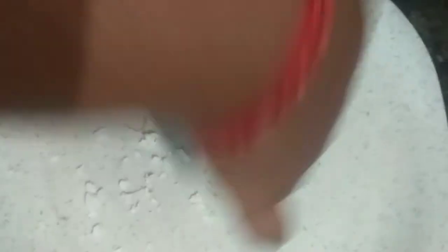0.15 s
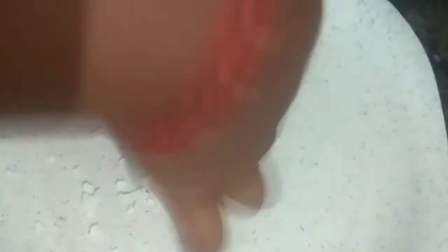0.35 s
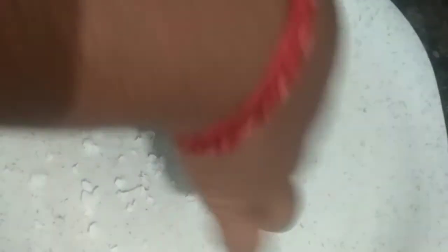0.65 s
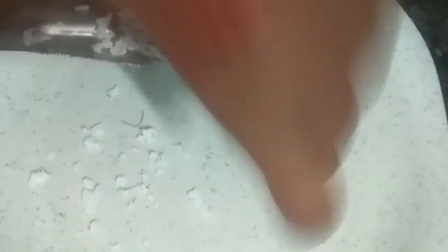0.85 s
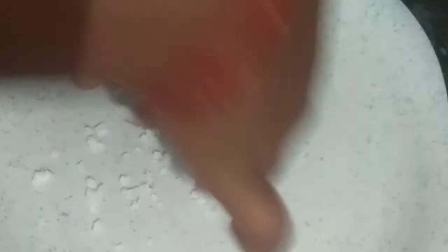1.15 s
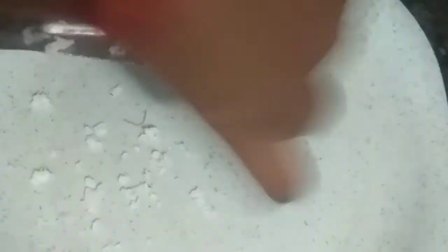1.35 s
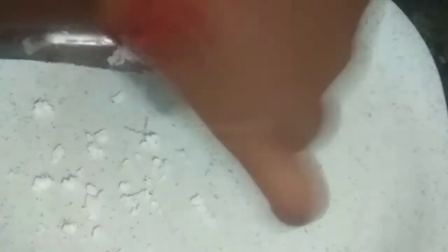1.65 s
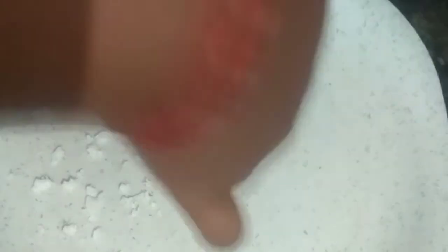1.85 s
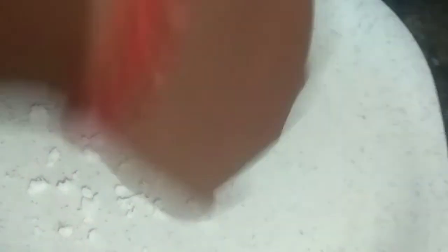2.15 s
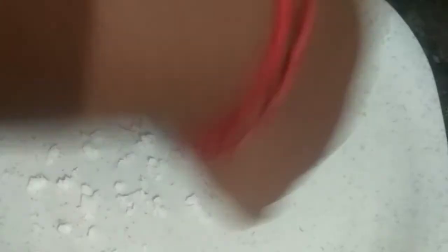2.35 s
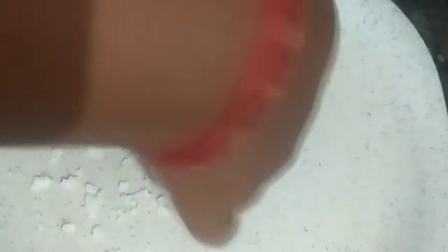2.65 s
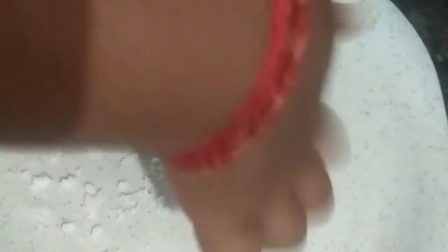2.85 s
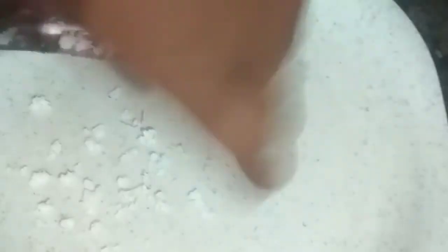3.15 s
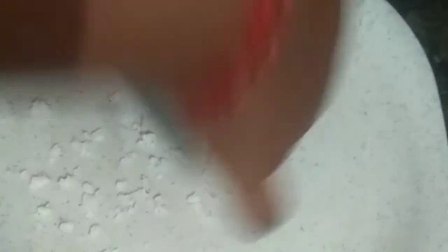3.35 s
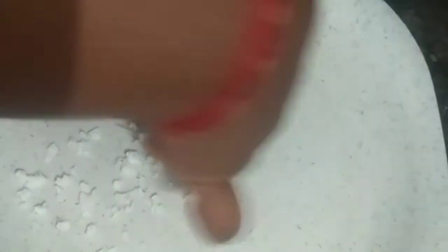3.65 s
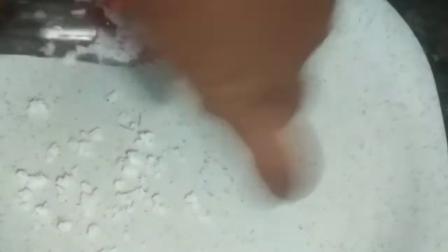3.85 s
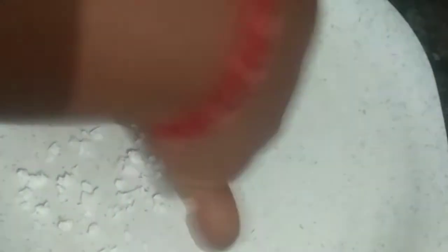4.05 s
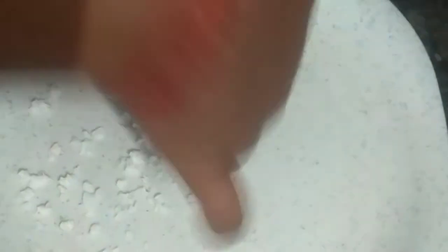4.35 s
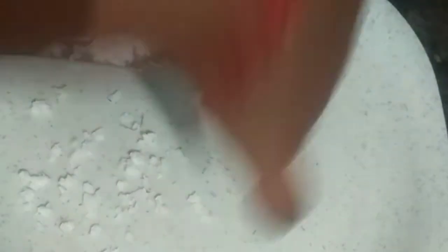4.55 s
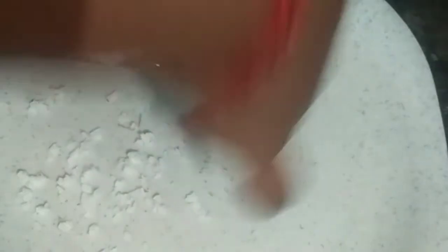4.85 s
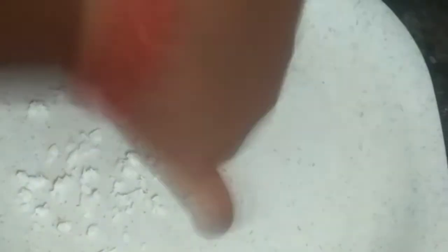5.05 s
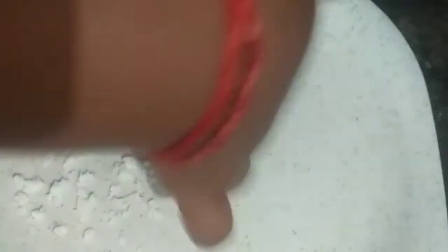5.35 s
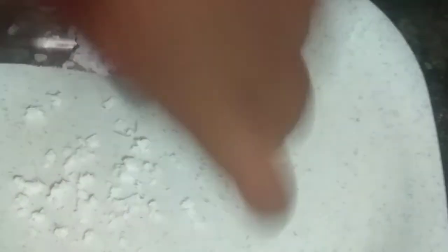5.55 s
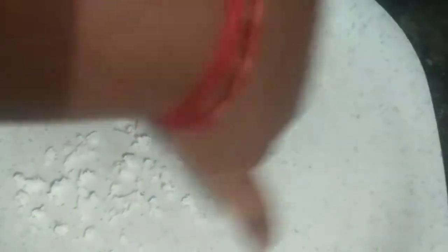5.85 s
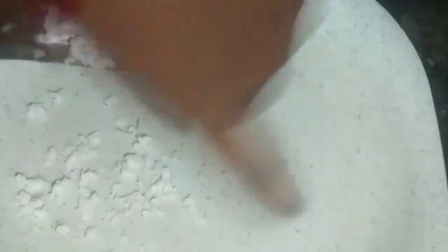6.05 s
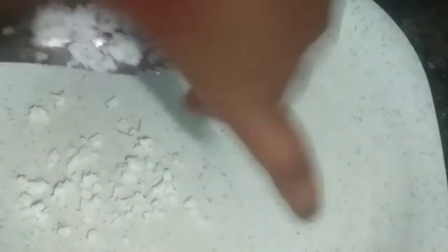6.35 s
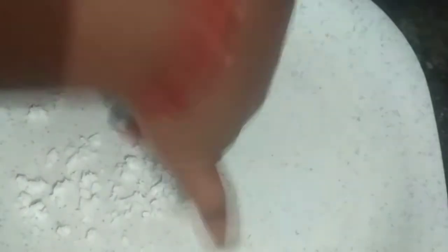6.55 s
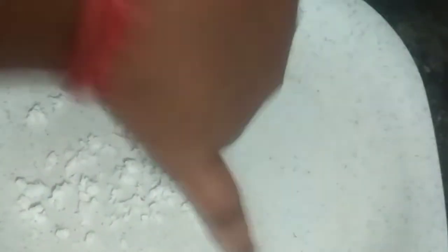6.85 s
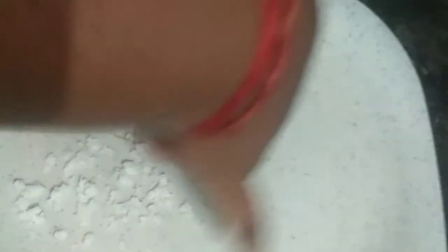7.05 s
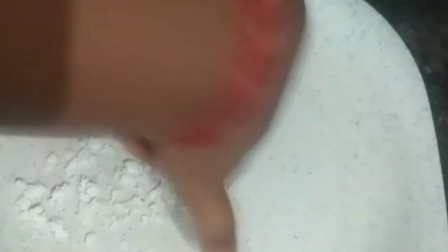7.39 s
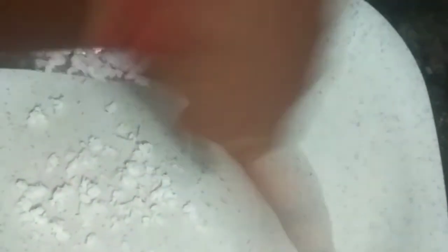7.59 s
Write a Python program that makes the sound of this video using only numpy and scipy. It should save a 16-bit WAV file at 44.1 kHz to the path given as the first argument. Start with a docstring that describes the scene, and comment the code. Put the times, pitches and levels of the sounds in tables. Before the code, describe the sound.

Close, steady rasping strokes of a coconut half scraped on a serrated metal blade, crunchy and bright, with short gaps and dull woody thumps.

```python
"""In a kitchen, close by: half a coconut is scraped over a serrated metal grater.
In each stroke the teeth tear the flesh: random click trains, coloured by filters and blade resonances.
Now and then they snag and slip: a dip, a short rip and a thump. Jerks ring the modes of shell, stand and hollow.
Between strokes come light ticks, brushing and narrow swishes of hiss, over the quiet air of the room."""
import sys
import numpy as np
from scipy import signal
from scipy.fft import rfft, irfft
from scipy.io import wavfile
from scipy.ndimage import uniform_filter1d

SR = 44100
rng = np.random.default_rng(int(sys.argv[2]) if len(sys.argv) > 2 else 0)


def master(y):
    """Save y as 16-bit WAV."""
    cut = np.clip(np.atleast_2d(y).T, -1, 1)
    pcm = np.round(cut * 32767)  # scale
    wavfile.write(sys.argv[1], SR, pcm.astype(np.int16))


N = 340452
TIME = np.arange(N) / SR

# pushes of the coconut over the teeth; layer levels are relative to an ordinary stroke:
# (start [s], length [s], gain from start to end [dB], crisp tearing [dB], coarse tearing [dB], shell [dB],
#  stand [dB], extra swell time [s], first bite before rip gain [dB], rubbing floor until next stroke [dB])
STROKES = [(-0.11, 0.14, -0.5, -2, -1.5, -1.5, 1.5, 0.0035, -20.0, -43.0),
           (0.286, 0.15, -13, -2.5, 0, 1.0, 1.0, 0.033, -20.0, -42.0),
           (0.935, 0.17, -8, 0.5, 2, 0.0, 0, 0.097, -24.0, -43.0),
           (1.3745, 0.13, -11.5, 1, 1, 4.5, 1, 0.055, -10.0, -46.0),
           (1.738, 0.13, -3.5, 1.5, 2, 1.5, 2.5, 0.041, -10.5, -42.0),
           (2.111, 0.15, -7.5, 0.0, 0.5, -0.5, -3.5, 0.037, -18.0, -51.0),
           (2.476, 0.15, -5, 0.0, 1, -1.5, -3.5, 0.048, -20.0, -44),
           (3.104, 0.16, 1.5, 4.0, 2.5, 3.5, -1.5, 0.072, -22.0, -44.0),
           (3.5112, 0.11, 4.0, 3.0, 2.0, -0.5, -2, 0.016, -5.0, -46.0),
           (3.8734, 0.13, 3.5, 2.0, 1.5, 0.5, -2.0, 0.027, -9.5, -46.0),
           (4.2445, 0.11, 2.5, 1.5, 2.5, 1.5, 1.5, 0.02, -8.0, -46.0),
           (4.604, 0.12, 5.0, -1, 1.5, 1.0, 1.5, 0.026, -9.5, -42.0),
           (5, 0.11, -4.5, 2, 6, 4.0, 5.5, 0.054, -11.0, -43.0),
           (5.622, 0.18, 1.5, -2.0, 0, -1.0, -2, 0.033, -13.5, -51.0),
           (6.0413, 0.15, 2, -1.0, -0.5, -1.5, 3.0, 0.035, -17.0, -53.0),
           (6.399, 0.157, 2, -1.0, -3, -1, -3.5, 0.032, -15.0, -48.0),
           (6.794, 0.15, 12, -3.0, -4.5, -5.5, -1, 0.0, -20.0, -51.0),
           (7.179, 0.15, 1.0, -2, -3.0, -2, 0, 0.018, -21.0, -47.0),
           (7.566, 0.15, 4, -1.5, -3.0, -2.5, -3.5, 0.014, -18.0, -47.0)]
# a tooth snags and breaks free: (time [s], level before rip gain [dB], thump relative to that level [dB])
SNAGS = [(0.3199, -7.5, -1), (0.3531, -6.5, -1), (1.0272, -6.5, -13), (1.0474, -2.5, -4),
         (1.4175, -6.5, -8), (1.4434, -6, -21), (1.814, -8, -16), (2.5338, -1.5, -19), (2.5687, -1, -16),
         (3.154, -12, -6), (3.175, 1, -1), (3.2061, 2.5, -5), (3.5598, 0, -18), (3.976, -8.5, -14),
         (4.295, -3, -7), (4.317, -5, -11), (4.6264, -5, -7), (4.652, -5, -8), (4.679, -4, 0),
         (5.044, -3, -4), (5.0713, -1, -20), (5.6868, -1.5, -19), (5.7134, -0.5, -13), (5.7357, -6, -8)]
# the coconut touches the teeth between strokes: (time [s], level before tick gain [dB])
TOUCHES = [(0.2266, -22), (0.831, -23), (1.2296, -21), (1.308, -26), (1.6766, -21), (2.4219, -28),
           (2.732, -19), (2.9832, -18), (2.9964, -24), (3.4264, -16), (3.815, -19.5), (4.1877, -15),
           (4.549, -19), (4.8302, -19), (5.4931, -15), (5.9748, -16.5), (6.351, -21), (6.721, -15.5),
           (7.119, -21), (7.51, -23)]
# resonances of the toothed blade: (frequency [Hz], width [Hz], level over the broad colour [dB])
BLADE = [(3460, 260, 1.5), (4606, 154, 7.5), (5160, 140, 7), (8230, 100, 9), (8936, 94, 10), (9320, 310, 6),
         (10230, 240, 6.5), (10880, 180, 6)]
# colour of a light touch on the teeth: (frequency [Hz], level [dB])
TICK = [(400, -13), (1200, -6), (3000, -13.5), (5500, -8.5), (7000, -6.5), (10000, 1.5), (12500, -5),
        (15700, -7.5)]


def from_db(db):
    """Decibels to gain."""
    return 10 ** (np.asarray(db) / 20)


def rms_one(x):
    """Scale to unit power."""
    return x / np.sqrt(np.mean(x ** 2) + 1e-20)


def evened(x, window_s):
    """Divide out the slow level, keep the fast grain."""
    power = np.mean(np.atleast_2d(x) ** 2, axis=0)
    width = max(int(window_s * SR), 8)
    smooth_power = uniform_filter1d(uniform_filter1d(power, width), width)
    return x / np.sqrt(smooth_power + 1e-12)


def drift(knots_per_s):
    """Random curve of unit power, linear between knots."""
    knots = rng.standard_normal(8192)
    return rms_one(np.interp(TIME * knots_per_s, np.arange(len(knots)), knots))


def highpassed(x, hz, order):
    """Butterworth bass cut below a corner."""
    return signal.sosfilt(signal.butter(order, hz, "high", fs=SR, output="sos"), x)


def convolved(x, response):
    """Causal filtering by an impulse response, one row per channel."""
    return signal.oaconvolve(np.atleast_2d(x), np.atleast_2d(response), axes=-1)[:, :N]


def coloured(x, spectrum, peaks=(), size=4096):
    """Minimum-phase filter of unit energy: a broad spectrum with resonances on top."""
    hz = np.fft.rfftfreq(size, 1 / SR) + 1   # +1 avoids log(0)
    points = np.array(spectrum)
    db = np.interp(np.log(hz), np.log(points[:, 0]), points[:, 1])
    for centre_hz, width_hz, peak_db in peaks:
        db = db + peak_db / (1 + (2 * (hz - centre_hz) / width_hz) ** 2)
    # folding the cepstrum forward in time gives minimum phase
    cepstrum = irfft(np.log(from_db(db)))
    cepstrum[1:size // 2] *= 2
    cepstrum[size // 2 + 1:] = 0
    response = irfft(np.exp(rfft(cepstrum)))
    return convolved(x, response / np.linalg.norm(response))


def ring(force, modes):
    """Parallel two-pole resonators of alternating sign; gain offsets the energy build-up of narrow modes."""
    out = 0
    for k, (hz, width_hz, db) in enumerate(modes):
        radius = np.exp(-np.pi * width_hz / SR)
        poles = [1, -2 * radius * np.cos(2 * np.pi * hz / SR), radius * radius]
        mode = signal.lfilter([1, 0, -1], poles, force + 1e-18)
        out = out + (-1) ** k * from_db(db) * np.sqrt(1 - radius) * mode
    return out


def grains(per_s, spread_db):
    """Random clicks of uneven size and either sign."""
    size_db = spread_db * np.minimum(rng.exponential(1, N), 4)
    sizes = from_db(size_db) * rng.choice([-1, 1], N)
    return sizes * (rng.random(N) < per_s / SR)


def blows(times_s, levels_db):
    """One click for each blow."""
    clicks = np.zeros(N)
    clicks[(np.asarray(times_s) * SR).astype(int)] = from_db(levels_db)
    return clicks


def bursts(rows, hold_s, fade_s):
    """Envelope of events that start at once, hold and decay exponentially."""
    out = np.zeros(N)
    for time_s, db, *_ in rows:
        first = int(time_s * SR)
        age_s = TIME[first:][:SR // 10] - time_s
        out[first:][:len(age_s)] += from_db(db) * np.exp(-np.maximum(age_s - hold_s, 0) / fade_s)
    return out


def swell(middle_s, half_s):
    """Cosine rise and fall of height one."""
    return np.cos(np.pi / 2 * np.clip((TIME - middle_s) / half_s, -1, 1))


def stroke_gain(shape, column):
    """Every stroke swells, arches while the pressure grows or eases, and dies away."""
    level_db, lead_s, attack_s, hold_s, release_db_per_s, arch_db = shape
    power = np.zeros(N)
    for start_s, length_s, lean_db, *levels_db, slow_s, _, _ in STROKES:
        near = slice(max(int((start_s - .1) * SR), 0), int((start_s + .6) * SR))
        age_s = TIME[near] - start_s
        rise = np.clip((age_s + lead_s) / (attack_s + slow_s), 0, 1)
        place = np.clip(age_s / length_s, 0, 1) - .5   # -.5 at start, +.5 at end
        held_db = level_db + levels_db[column] + lean_db * place - arch_db * (2 * place) ** 2
        fall_db = release_db_per_s * np.maximum(age_s - length_s - hold_s, 0)
        power[near] += (rise * from_db(held_db - fall_db)) ** 2
    return np.sqrt(power)


def efforts(unsteady_db=0.6, fidget_db=2.5):
    """Levels in dB of crisp and coarse tearing, shell and stand: strokes over light handling between them."""
    # how each part answers a stroke: (level [dB], lead before start [s], attack [s], hold after end [s],
    #  release [dB/s], loss towards both ends [dB])
    crisp_shape = (-16.2, .024, .009, .001, 350, 1.8)
    coarse_shape = (-25.3, 0.0265, .014, -.006, 187, 2.5)
    shell_shape = (-18.2, 0.02, 0.06, 0.0182, 185, 1.1)
    stand_shape = (-22.5, -0.01, 0, .023, 179, 1.6)
    coarse_rest_db, shell_rest_db, stand_rest_db = -50, -45, -37.5   # the hands never keep quite still
    starts_s, rub_db = np.array(STROKES)[:, 0], np.array(STROKES)[:, -1]
    stroke_index = np.searchsorted(starts_s, TIME) - 1
    rubbing = uniform_filter1d(from_db(rub_db)[stroke_index], SR // 20)
    grip = from_db(unsteady_db * drift(knots_per_s=45))
    fidget = from_db(fidget_db * drift(knots_per_s=22))
    rests = [rubbing] + [from_db(db) * fidget for db in (coarse_rest_db, shell_rest_db, stand_rest_db)]
    shapes = crisp_shape, coarse_shape, shell_shape, stand_shape
    pushes = [grip * stroke_gain(shape, column) for column, shape in enumerate(shapes)]
    return [20 * np.log10(np.hypot(push, rest)) for push, rest in zip(pushes, rests)]


def sticking(stick_s=0.013):
    """Before a snag breaks free the teeth stand still: the harder the snag, the deeper the pause."""
    dip_db = np.zeros(N)
    pause = signal.windows.tukey(int(stick_s * SR), .4)
    for time_s, snag_db, _ in SNAGS:
        depth_db = np.clip(13 + snag_db, 2, 12)
        end = int(time_s * SR)
        dip_db[end - len(pause):end] -= depth_db * pause
    return from_db(dip_db)


def tearing(crisp_db, coarse_db, judder):
    """Cells burst in a fine crackle and fibres tear in a coarser one, both under the judder of the teeth."""
    # colours of the tearing flesh: (frequency [Hz], level [dB])
    crisp_colour = [(2000, -24.5), (3000, -7.2), (4000, -9.5), (4900, -7.5), (6000, -9), (7500, -8.5),
                    (8800, -5), (10000, -4.5), (11200, -3), (12500, -9), (14000, -13), (15700, -15.5)]
    coarse_colour = [(500, -5.5), (900, 0), (1300, -0.5), (1650, -3.5), (2100, 0.5), (2600, -0.5),
                     (3200, 2.5), (3900, 0), (5000, -2.5), (6500, 1), (10000, -14)]
    jerky = from_db(1.5 * judder)
    cells = evened(grains(per_s=4000, spread_db=3.5) * jerky, window_s=.016)
    fibres = evened(grains(per_s=1100, spread_db=3.7) * jerky, window_s=.02)
    crisp = coloured(cells * from_db(crisp_db), crisp_colour, BLADE)
    coarse = coloured(fibres * from_db(coarse_db), coarse_colour, BLADE)
    return (crisp + coarse)[0] * sticking()


def catches(bite_thump_db=-16.0):
    """First bites and later snags: (time [s], level before rip gain [dB], thump relative to it [dB])."""
    bites = [(start_s, bite_db, bite_thump_db) for start_s, *_, bite_db, _ in STROKES if start_s > 0]
    return bites + SNAGS


def snaps():
    """A biting or freed tooth rips a short run of flesh; a light touch gives a small sharp tick."""
    # colour of a rip: (frequency [Hz], level [dB])
    rip_colour = [(400, -11), (1000, -2), (1700, -13.5), (3200, -3), (5000, -3.5), (6500, -10.5), (9000, 4),
                  (11000, 0.5), (12500, -11), (15700, -12)]
    crackle = evened(grains(per_s=5000, spread_db=2.0), window_s=0.0018)
    rips = crackle * bursts(catches(), hold_s=.0055, fade_s=.003)
    ticks = crackle * bursts(TOUCHES, hold_s=.002, fade_s=.005)
    return (from_db(-8.4) * coloured(rips, rip_colour, BLADE) + from_db(-5.0) * coloured(ticks, TICK))[0]


def brushing():
    """Flesh slides lightly over the tips of the teeth between strokes: a fine bright crackle."""
    # brushes: (middle [s], half length [s], level [dB])
    brushes = [(0.235, 0.036, -37), (0.735, 0.04, -35), (0.88, .04, -36), (2.035, 0.023, -37),
               (4.87, .055, -29.5), (5.2, 0.038, -33), (5.29, 0.081, -32)]
    crackle = evened(grains(per_s=5000, spread_db=3.0), window_s=.012)
    envelope = sum(from_db(db) * swell(middle_s, half_s) for middle_s, half_s, db in brushes)
    return coloured(crackle * envelope, TICK)[0]


def near_field(x, direct_db=-8.0, lead_s=.00041, near_t60_s=0.0028, size=2560):
    """Shell and hand scatter the sound; as they move the paths change, so notches and peaks keep shifting."""
    age_s, hop = TIME[:size // 4], size // 2
    decay = from_db(-60 * age_s / near_t60_s) + from_db(-9 - 60 * age_s / .03)   # fast and slow parts
    window = np.sin(np.pi * np.arange(size) / size)
    padded, out = np.pad(x, (hop, size)), np.zeros((2, N + 3 * size))
    for start in range(0, N + hop, hop):
        paths = rng.standard_normal((2, len(age_s))) * decay / np.linalg.norm(decay)
        paths[[0, 1], [0, int(abs(lead_s) * SR)]] += from_db(direct_db)   # the left microphone is nearer
        paths /= np.linalg.norm(paths, axis=1, keepdims=True)
        piece = signal.fftconvolve(padded[None, start:start + size] * window, paths, axes=-1)
        out[:, start:start + piece.shape[1]] += piece
    return out[:, hop:hop + N]


def shaking(shell_db, stand_db, judder, thump_delay_s=0.00576, touch_thump_db=-7):
    """Uneven jerks ring shell and stand; bites, snags and touches add thumps, the rim adds dull bumps."""
    # modes of the hand-held shell on the blade, and of the stand: (frequency [Hz], width [Hz], level [dB])
    shell_modes = [(274.8, 20, -1.2), (296.6, 14.3, -1.5), (311.2, 7.6, -0.7), (338.4, 8.7, -3.3),
                   (365.2, 8.3, -1.7), (384.5, 9.2, -6), (415.8, 17, -6), (503.4, 34, -13),
                   (548.7, 14.8, -11), (646.2, 13.6, -14.5), (696, 11, -15.5), (739.5, 18, -17),
                   (798, 30, -14), (862, 10, -24.5)]
    stand_modes = [(106, 4.4, -15.5), (138.3, 12, -4), (151, 3.7, -5.5), (170, 7.5, 2.3), (202.2, 25, -7.5)]
    # the rim of the shell bumps the blade: (time [s], level before bump gain [dB])
    rim_bumps = [(0.508, -27), (1.702, -28), (1.939, -21), (5.8691, -30), (5.9244, -24.5)]
    jerks = grains(per_s=450, spread_db=2.5) * from_db(2.1 * judder)
    shell = evened(ring(jerks, shell_modes), window_s=0.049) * from_db(shell_db)
    stand = highpassed(ring(jerks, stand_modes), hz=100, order=3)
    stand = evened(stand, window_s=0.032) * from_db(stand_db)

    contacts = catches() + [(time_s, db, touch_thump_db) for time_s, db in TOUCHES]
    times_s, levels_db, thump_db = np.transpose(contacts)
    thump_blows = blows(times_s + thump_delay_s, levels_db + thump_db)
    thumps = from_db(18.5) * ring(thump_blows, [(328, 120, -5.5), (167, 69, -2.5)])
    thumps = highpassed(thumps, hz=120, order=2)
    bump_modes = [(1270, 64, 3.5), (1510, 140, -12), (800, 50, -7)]
    bumps = from_db(7.0) * ring(blows(*np.transpose(rim_bumps)), bump_modes)

    # the shell also rocks sideways, which the two microphones hear in opposite phase
    rocking = evened(ring(grains(per_s=450, spread_db=7.0), shell_modes), window_s=0.032)
    rocking = highpassed(rocking * from_db(shell_db), hz=510, order=6)
    middle = (shell + thumps + bumps) * from_db([[.9], [-.9]]) + stand * from_db([[-.9], [.7]])
    return middle + from_db(-2.5) * rocking * [[1], [-1]]


def hollow(shell_db, coarse_db, judder, level_db=-15.0):
    """The air in the shell rings, following the mean dB level of the shaking and the coarse tearing."""
    # modes of the air in the hollow: (frequency [Hz], width [Hz], level [dB])
    air_modes = [(1017, 120, -4.5), (1128, 51, -2), (1188, 34, -0.5), (1254, 68, -2), (1326, 50, 1)]
    jerky = from_db(2.3 * judder)
    knocks = np.array([ring(grains(per_s=700, spread_db=3.0) * jerky, air_modes) for side in range(2)])
    knocks = knocks + 0.1 * knocks[::-1]   # each microphone hears some of the other side
    return evened(knocks, window_s=0.04) * from_db((shell_db + coarse_db) / 2 + level_db)


def swishes(cutoff_hz=340):
    """Low-passed hiss multiplied by a gliding sine: faint narrow bands that slide in pitch."""
    # swishes: (middle [s], half length [s], start frequency [Hz], end frequency [Hz], level [dB])
    glides = [(3.8, 0.044, 5900, 6200, -42.5), (4.107, .09, 6330, 6200, -44),
              (5.382, .1, 3880, 5370, -38.5), (5.42, 0.083, 6300, 6100, -43), (7.46, .07, 6000, 6200, -46)]
    out = np.zeros((2, N))
    lowpass = signal.butter(2, cutoff_hz, fs=SR, output="sos")
    hiss = rms_one(signal.sosfilt(lowpass, rng.standard_normal((2, N))))
    hiss = rms_one(hiss + .5 * hiss[::-1])   # partly shared between channels
    for middle_s, half_s, start_hz, end_hz, db in glides:
        hz = np.interp(TIME, [middle_s - half_s, middle_s + half_s], [start_hz, end_hz])
        carrier = np.sqrt(2) * np.sin(2 * np.pi * np.cumsum(hz) / SR)
        out += from_db(db) * swell(middle_s, half_s) * carrier * hiss
    return out


def echoes(t60_s):
    """Dense decaying reflections of unit energy, different at each microphone."""
    age_s = TIME[:SR // 2]
    response = rng.standard_normal((2, len(age_s))) * from_db(-60 * age_s / t60_s)
    return response / np.sqrt(np.sum(response ** 2, axis=1, keepdims=True))


def kitchen(level_db=-37.5, wide_above_hz=450, width=0.94):
    """Still air of the room: filtered noise, its rumble nearly the same at both microphones, its hiss not."""
    # colour of the still kitchen: (frequency [Hz], level [dB])
    air_colour = [(20, -11), (40, -3), (70, 1.5), (130, 10.5), (250, 1), (600, -7), (1500, -11.5),
                  (4000, -14.5), (10000, -15.5), (15500, -22)]
    middle, side = rng.standard_normal((2, N))
    side = width * highpassed(side, hz=wide_above_hz, order=1)
    return from_db(level_db) * rms_one(coloured(middle + side * [[1], [-1]], air_colour))


def scene():
    """The strokes drive tearing and shaking; the kitchen answers the shaking more than the rasp."""
    crisp_db, coarse_db, shell_db, stand_db = efforts()
    judder = drift(knots_per_s=190)
    teeth = tearing(crisp_db, coarse_db, judder) + snaps() + brushing()
    rasp = near_field(teeth) * from_db([[.5], [-.4]])
    body = shaking(shell_db, stand_db, judder) + hollow(shell_db, coarse_db, judder)
    room = convolved(from_db(-19) * rasp + from_db(-17) * body, echoes(t60_s=.3))
    return rasp + body + room + swishes() + kitchen()


def record(dry, cutoff_hz=15700):
    """The highest peaks clip, then a steep elliptic low-pass cuts the top."""
    lowpass = signal.ellip(10, .2, 70, cutoff_hz, fs=SR, output="sos")
    return signal.sosfilt(lowpass, np.clip(dry, -1, 1))


dry = scene()
out = record(dry)
master(out)
```